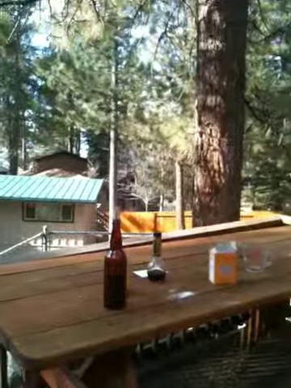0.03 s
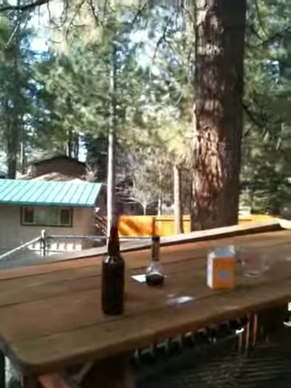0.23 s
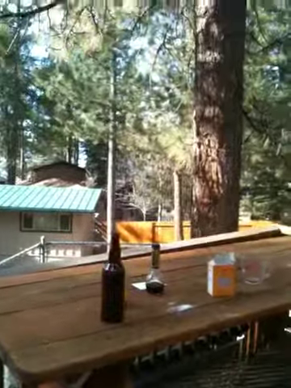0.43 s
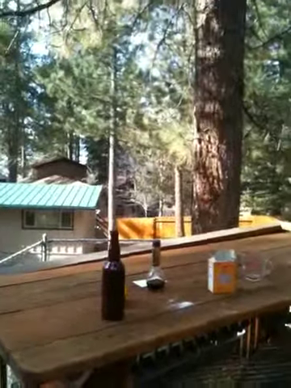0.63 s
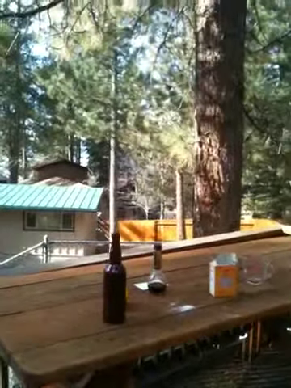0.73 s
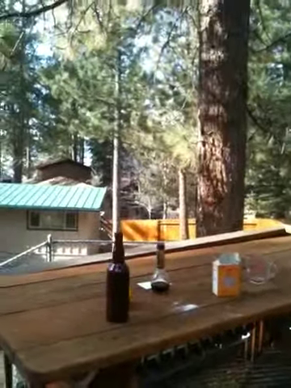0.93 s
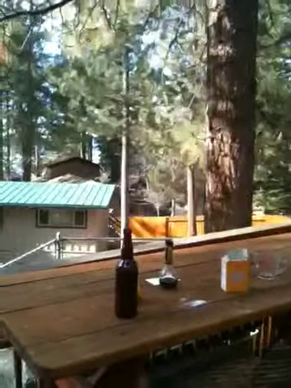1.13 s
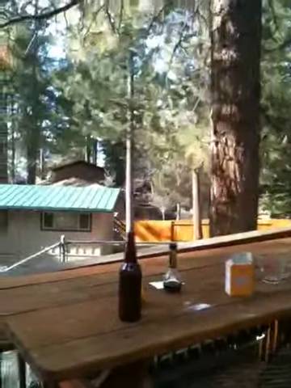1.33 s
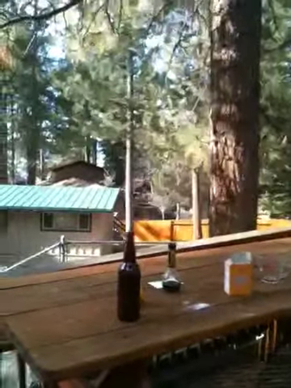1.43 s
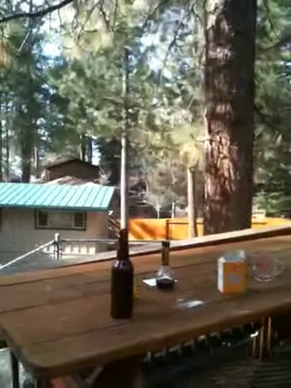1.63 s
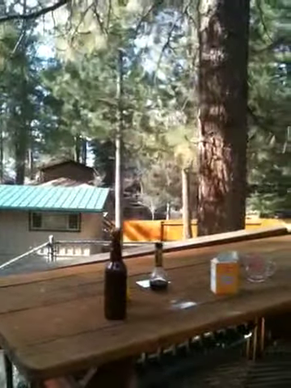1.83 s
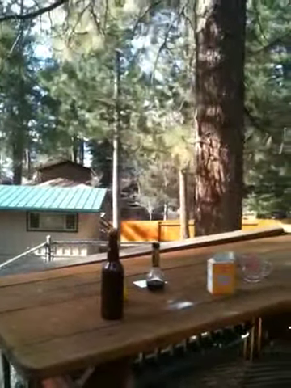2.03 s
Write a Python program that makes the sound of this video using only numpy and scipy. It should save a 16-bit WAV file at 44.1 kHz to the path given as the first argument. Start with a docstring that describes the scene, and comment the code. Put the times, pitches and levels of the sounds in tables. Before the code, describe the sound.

A cork pops loudly out of a bottle at about 0.15 seconds, with a short burst of gas. At 0.3 seconds it thuds against wood, and both bangs fade among trees with a faint glassy ring. From 0.6 seconds, soft knocks, patters and small ticks scatter over the boards. Sharper clicks come around 1.55 and 1.8 seconds, the strongest at 1.85. The outdoor air is otherwise still.

```python
"""A cork shoots out of a bottle on a wooden deck among tall trees, in still air.
First the pop: a pressure pulse, a jet of gas, the ringing neck and a dull echo.
A moment later the cork thuds against wood; both bangs die away in the forest.
Faint knocks, sharp ticks and soft patters follow, as of small things dropping on the boards.
Each sharp sound leaves a thin glassy ring."""
import sys
import numpy as np
from scipy import signal
from scipy.io import wavfile
from scipy.ndimage import uniform_filter1d

SR = 44100
rng = np.random.default_rng(int(sys.argv[2]) if len(sys.argv) > 2 else 0)


def file_out(sig):
    """Save sig as 16-bit WAV at sys.argv[1]."""
    # one column per channel
    cols = np.atleast_2d(sig).T
    # limit, then scale
    lim = np.clip(cols, -1, 1)
    pcm = np.round(lim * 32767).astype(np.int16)
    wavfile.write(sys.argv[1], SR, pcm)


N = 92610
TIME_S = np.arange(N) / SR
BANDS_HZ = 31.25 * 2 ** (np.arange(28) / 3)

# outdoor air: (frequency [Hz], third-octave level [dB])
AIR_SPECTRUM = [(30, -114), (80, -103), (180, -83), (400, -86), (900, -83.5), (1800, -84.5), (4000, -87.5),
                (8000, -85), (13000, -84), (15500, -83)]
# decay among the trees: (frequency [Hz], t60 [s])
FOREST_DECAY = [(60, 0.61), (200, 2.2), (500, 1.7), (1600, 1.5), (2800, 1.0), (5700, 0.37), (15000, .45)]
# soft patters: (time [s], hold [s], level [dB], tilt [dB/octave])
PATTER_EVENTS = [(0.677, 0.014, -63.5, 7.5), (0.944, .018, -69, -9), (1.18, 0.0052, -67, -3),
                 (1.284, 0.015, -59.5, 0.5), (1.441, 0.018, -60, 3.5), (1.494, 0.011, -65.5, -2.5),
                 (1.624, 0.019, -71.5, -9.5), (1.679, 0.008, -63, 5), (1.835, 0.013, -56, -5),
                 (1.968, .018, -63, -2.5)]
# patter colour: (frequency [Hz], third-octave level [dB])
PATTER_SPECTRUM = [(300, -40.5), (1100, -21), (1800, -3.5), (2900, -4), (4200, -17), (5600, -15.5),
                   (8000, -17.5), (12000, -16.5), (16000, -25)]
# knocks on wood: (time [s], level [dB])
KNOCK_EVENTS = [(.620, -46.5), (.845, -56.5), (1.16, -58), (1.195, -59.5), (1.244, -63), (1.305, -70),
                (1.59, -50.5), (1.617, -53.5), (1.701, -58), (1.0, -58.5)]
# knocked wood: (frequency [Hz], level [dB], t60 [s])
KNOCK_BANDS = [(60, -54, .1), (94.7, -47, .15), (143, -15, 0.16), (208, -15.5, .4), (350, -10.5, 0.13),
               (700, -21.5, 0.11), (1500, -27, .1), (4000, -33, 0.061)]
# sharp ticks: (time [s], level [dB], tilt [dB/octave], scatter offset [dB])
TICK_EVENTS = [(0.661, -54, -3, -8), (0.6742, -40, 2.5, -6), (0.7433, -44.5, 2, 1), (0.8487, -49, 5.5, -1),
               (0.9304, -39, -2.5, -0.5), (0.9824, -48.5, 11.5, 4), (.995, -56.5, 16, -5),
               (1.0278, -38.5, 2.5, -0.5), (1.1327, -59, 18, -2), (1.1455, -40, -5.5, -2.5),
               (1.205, -59, 16.5, -3), (1.2523, -38, -1, 0), (1.2696, -30, -3.5, -3), (1.322, -49, 9, 2),
               (1.3301, -34.5, -4, -6), (1.522, -54, 7, -17), (1.5481, -21.5, 0.5, 1.5),
               (1.575, -50, 14, -8), (1.5834, -23, 1.5, 4), (1.6455, -56.5, 12, -3), (1.682, -48, 13, 7),
               (1.6896, -38, 10.5, -8), (1.703, -46, 3, -14), (1.7286, -44, -7, 2.5), (1.731, -41, 13, -9),
               (1.747, -66, 12, -11), (1.8011, -21, 4.5, 1), (1.8269, -29, 3.5, -3.5),
               (1.8519, -9, .5, -1.5)]
# ring of a tiny contact: (nominal frequency [Hz], level [dB], t60 [s])
CONTACT_MODES = [(1760, -12.5, 0.0049), (2570, -6.5, 0.0069), (2943, -10, 0.0047), (5620, -6.5, 0.0039),
                 (8000, -13.5, 0.0031), (11400, -13, 0.0013)]
# tick scatter off the deck: (frequency [Hz], level [dB], t60 [s])
TICK_REFLECTIONS = [(300, -63.5, 0.05), (1060, -56.5, 0.33), (1660, -36.5, 0.16), (2730, -26, 0.098),
                    (4040, -34.5, 0.054), (5400, -27.5, 0.061), (7400, -41, 0.12), (11800, -54, 0.18),
                    (16000, -45.5, 0.088)]
# wood struck by the cork: (frequency [Hz], level [dB], t60 [s])
WOOD_MODES = [(207.6, -38, 0.26), (341, -34, 0.3), (437, -29.5, 0.12), (603, -22, 0.077), (775, -21, .1),
              (935, -23.5, 0.098), (1144, -29, 0.076), (1640, -22.5, .09), (1933, -15.5, .07),
              (2510, -31.5, 0.094), (1497, -49, 0.86), (1630, -61, 1.5)]
# thud scatter: (frequency [Hz], near level [dB], near t60 [s], far level [dB])
THUD_REFLECTIONS = [(45, -63, .25, -100), (100, -62, .25, -80), (143, -50.5, 0.22, -69),
                    (200, -31, 0.25, -56.5), (351, -37, 0.31, -74.5), (750, -29.5, 0.23, -61),
                    (1250, -33, 0.24, -64.5), (1760, -25.5, 0.16, -61.5), (2760, -38, .15, -74),
                    (3900, -52, 0.24, -68.5), (6000, -50.5, 0.094, -82), (8900, -46.5, 0.06, -68.5),
                    (15260, -64.5, .12, -93.5)]
# escaping gas: (frequency [Hz], third-octave level [dB])
JET_SPECTRUM = [(40, -41), (90, -43.5), (200, -28.5), (500, -29.5), (900, -36.5), (1400, -26), (2500, -19),
                (4000, -19.5), (5700, -16.5), (9000, -21), (13000, -18.5), (16000, -21.5)]
# opened bottle: (frequency [Hz], level [dB], t60 [s])
BOTTLE_MODES = [(385, -25, .09), (1078, -23.5, 0.049), (1465, -21.5, 0.093), (1842, -14.5, .1),
                (2500, -13, .07), (3655, -22, .055), (4110, -19.5, 0.04), (5420, -21.5, 0.08),
                (5700, -17.5, .028), (8830, -20.5, .06), (13200, -26, .05)]
# pop scatter: (frequency [Hz], near level [dB], near t60 [s], far level [dB])
POP_REFLECTIONS = [(50, -62.5, 0.16, -96), (97, -54.5, 0.16, -85.5), (152, -36.5, 0.35, -61.5),
                   (230, -38, 0.34, -60), (497, -39.5, 0.24, -59.5), (960, -43.5, 0.24, -63.5),
                   (1760, -31.5, 0.25, -52.5), (2600, -24, 0.19, -50.5), (4200, -37, 0.22, -65.5),
                   (5700, -32, .2, -54.5), (8000, -32.5, 0.25, -61), (15000, -33, 0.28, -64)]


def from_db(db):
    """Decibels to gain."""
    return 10 ** (np.asarray(db) / 20)


def at_hz(table, hz):
    """Table columns interpolated over log frequency."""
    table_hz, *columns = np.transpose(table)
    return [np.interp(np.log(hz), np.log(table_hz), column) for column in columns]


def decay(t, t60_s):
    """Unity until t = 0, then 60 dB down per t60_s."""
    return np.exp(-np.log(1000) * np.maximum(t, 0) / t60_s)


def onset(t, rise_s):
    """Smooth rise from t = 0."""
    return 1 - np.exp(-(np.maximum(t, 0) / rise_s) ** 2)


def add(out, time_s, sound):
    """Mixes a sound in at time_s."""
    start = int(time_s * SR)
    out[start:start + len(sound)] += sound[:N - start]


def band_noises():
    """Independent third-octave noises, rms 1 each."""
    edges, settle = 2 ** (np.array([-1, 1]) / 6), SR // 2
    filters = [signal.butter(3, hz * edges, "band", fs=SR, output="sos") for hz in BANDS_HZ]
    bands = np.array([signal.sosfilt(sos, rng.standard_normal(N + settle))[settle:] for sos in filters])
    return bands / bands.std(axis=1, keepdims=True)


def shaped(bands, gain_at):
    """Random stretch of the bands, summed under a gain or envelope per frequency."""
    gains = np.array([np.atleast_1d(gain_at(hz)) for hz in BANDS_HZ])
    length = gains.shape[1] if gains.shape[1] > 1 else N
    stretch = bands.take(rng.integers(N) + np.arange(length), axis=1, mode="wrap")
    return (stretch * gains).sum(axis=0)


def ring(modes, t, tilt_db_oct=0):
    """Struck modes, signs alternating, tilted about 4 kHz."""
    out = np.zeros(len(t))
    for k, (hz, db, t60_s) in enumerate(modes):
        gain = (-1) ** k * from_db(db + tilt_db_oct * np.log2(hz / 4000))
        out += gain * decay(t, t60_s) * np.sin(2 * np.pi * hz * t)
    return out


def puff(t, hz, width_s, db):
    """Short swing of air pressure centred on t = 0."""
    return from_db(db) * np.exp(-.5 * (t / width_s) ** 2) * np.cos(2 * np.pi * hz * t)


def air():
    """Still outdoor air: faint steady noise."""
    return shaped(band_noises(), lambda hz: from_db(at_hz(AIR_SPECTRUM, hz)[0]))


def scatter(bands, table, rise_s):
    """Dense near reflections off deck and walls, plus the long tail from the trees."""
    def envelope(hz):
        near_db, near_t60_s, far_db = at_hz(table, hz)
        near = from_db(near_db) * decay(TIME_S, near_t60_s)
        far = from_db(far_db) * decay(TIME_S, at_hz(FOREST_DECAY, hz)[0])
        return onset(TIME_S, rise_s) * np.hypot(near, far)
    return shaped(bands, envelope)


def glassy_ring(drive, hz=5650, width_hz=750):
    """Close high resonances, perhaps glassware on the table, ring along."""
    bandpass = signal.butter(2, [hz - width_hz / 2, hz + width_hz / 2], "band", fs=SR, output="sos")
    tail = rng.standard_normal(SR) * decay(TIME_S[:SR], t60_s=.38)
    response = signal.sosfilt(bandpass, tail / np.linalg.norm(tail))
    return from_db(-17) * signal.fftconvolve(drive, response)[:N]


def patters(bands):
    """Soft grainy clusters of contacts too small to tell apart."""
    out, t = np.zeros(N), TIME_S[:SR // 4]
    for time_s, hold_s, db, tilt_db_oct in PATTER_EVENTS:
        grain = uniform_filter1d(rng.standard_normal(len(t)), size=40)
        grain_db = grain / grain.std()
        swell = onset(t, rise_s=.0025) * decay(t - hold_s, t60_s=.15) * from_db(db + grain_db)
        def envelope(hz):
            return swell * from_db(at_hz(PATTER_SPECTRUM, hz)[0] + tilt_db_oct * np.log2(hz / 3000))
        add(out, time_s, shaped(bands, envelope))
    return out


def knocks(bands):
    """Faint dull knocks on wood: noise decaying band by band."""
    out, t = np.zeros(N), TIME_S[:SR // 2]
    def body(hz):
        band_db, t60_s = at_hz(KNOCK_BANDS, hz)
        return from_db(band_db) * decay(t, t60_s) * onset(t, rise_s=.0031)
    for time_s, db in KNOCK_EVENTS:
        add(out, time_s, from_db(db) * shaped(bands, body))
    return out


def contact(tilt_db_oct):
    """One tiny hard contact: brief modes, each randomly detuned."""
    detune = np.exp(.079 * rng.uniform(-.81, 1, len(CONTACT_MODES)))
    modes = [(hz * ratio, db, t60_s) for (hz, db, t60_s), ratio in zip(CONTACT_MODES, detune)]
    return ring(modes, TIME_S[:SR // 20], tilt_db_oct)


def specks(count=18, from_s=.56, to_s=1.25, max_db=-51.5, spread_db=9):
    """Faint contacts falling at random."""
    out = np.zeros(N)
    for when, faintness, brightness in rng.random(size=(count, 3)):
        speck = from_db(max_db - spread_db * faintness) * contact(tilt_db_oct=11 * brightness)
        add(out, from_s + when * (to_s - from_s), speck)
    return out


def ticks(bands, far_db=-34):
    """Sharp contacts, each scattered by deck and trees."""
    out, t = np.zeros(N), TIME_S[:SR // 2]
    for time_s, db, tilt_db_oct, scatter_db in TICK_EVENTS:
        def envelope(hz):
            band_db, t60_s = at_hz(TICK_REFLECTIONS, hz)
            tail = decay(t, t60_s) + from_db(far_db) * decay(t, at_hz(FOREST_DECAY, hz)[0])
            return from_db(band_db + scatter_db + tilt_db_oct * np.log2(hz / 4000)) * tail
        add(out, time_s, from_db(db) * contact(tilt_db_oct))
        add(out, time_s, from_db(db) * onset(t, rise_s=.001) * shaped(bands, envelope))
    return out


def thud(bands, time_s=.3092):
    """The cork hits wood: ringing modes and their scatter."""
    out = np.zeros(N)
    wood = ring(WOOD_MODES, TIME_S) * onset(TIME_S, rise_s=.0012)
    add(out, time_s, wood + scatter(bands, THUD_REFLECTIONS, rise_s=.0022))
    return out


def pop(bands, time_s=.1443, echo_s=.199, jet_rise_s=.001, jet_hold_s=.0043, neck_hz=195):
    """The cork leaves: gas jets out, the air in the neck springs back and forth, the bottle rings."""
    t = TIME_S - time_s
    flow = np.exp(np.minimum(t, 0) / jet_rise_s) * decay(t - jet_hold_s, t60_s=.02)
    jet = flow * shaped(bands, lambda hz: from_db(at_hz(JET_SPECTRUM, hz)[0]))
    pulse = puff(t, hz=450, width_s=.0008, db=-5.5)
    neck_envelope = from_db(-12) * onset(t, rise_s=.002) * decay(t, t60_s=.055)
    neck = -neck_envelope * np.sin(2 * np.pi * neck_hz * t)
    echo = puff(TIME_S - echo_s, hz=200, width_s=.005, db=-33)  # probably off a house wall
    bottle = ring(BOTTLE_MODES, TIME_S) * onset(TIME_S, rise_s=.0015)
    out = jet + pulse + neck + echo
    add(out, time_s, bottle + scatter(bands, POP_REFLECTIONS, rise_s=.012))
    return out


def scene():
    """Pop, thud and small sounds over quiet air; mono."""
    bands = band_noises()
    background = air()
    bangs = pop(bands) + thud(bands) + knocks(bands)
    bass_cut = signal.butter(3, 450, "high", fs=SR, output="sos")  # small things radiate no bass
    small = signal.sosfilt(bass_cut, patters(bands) + ticks(bands) + specks())
    glass = glassy_ring(bangs + from_db(-5) * small)
    return (background + glass + small + bangs)[None]


def record(dry, ceiling=.8, cutoff_hz=15900):
    """The pop overloads the microphone: soft clip, then steep low-pass."""
    clipped = ceiling * np.tanh(dry / ceiling)
    return signal.sosfilt(signal.cheby1(12, .2, cutoff_hz, fs=SR, output="sos"), clipped)


dry = scene()
out = record(dry)
file_out(out)
```